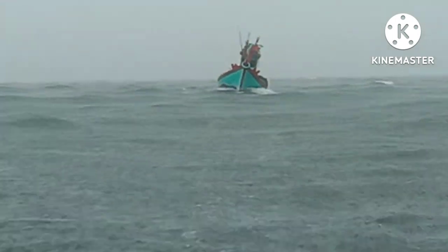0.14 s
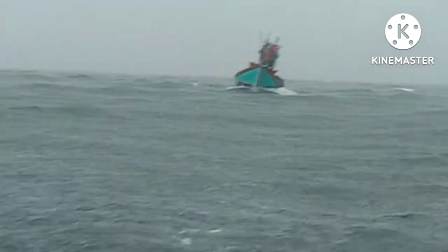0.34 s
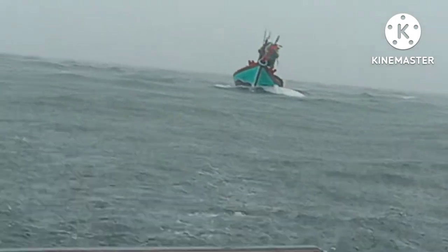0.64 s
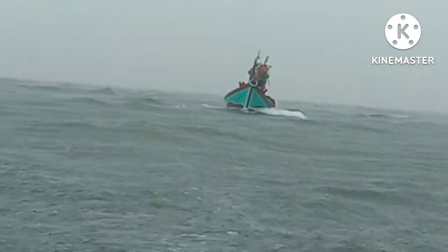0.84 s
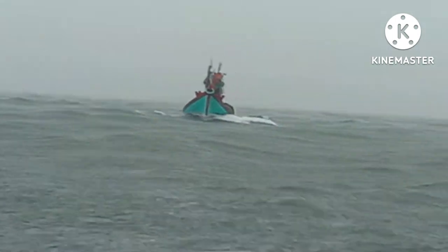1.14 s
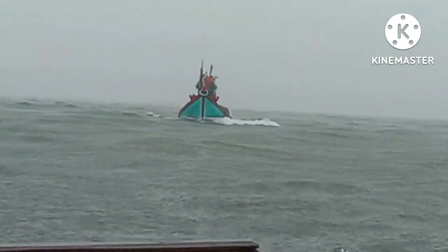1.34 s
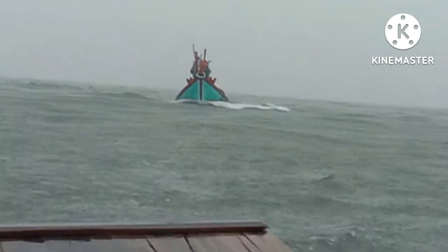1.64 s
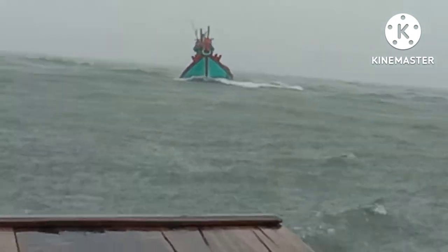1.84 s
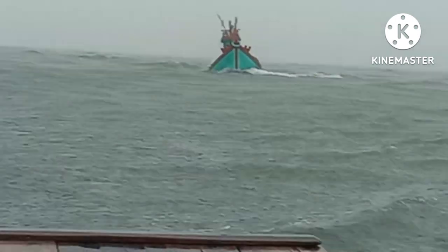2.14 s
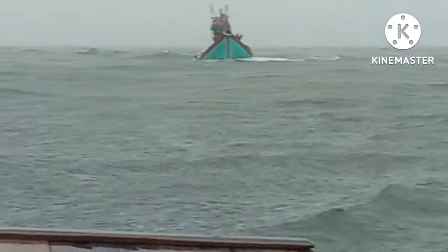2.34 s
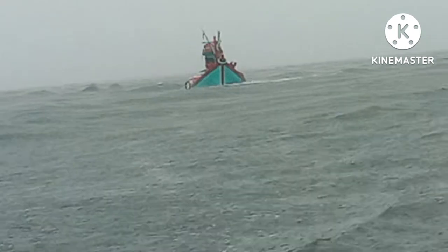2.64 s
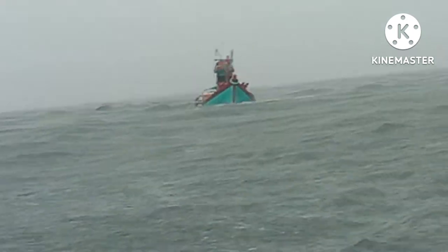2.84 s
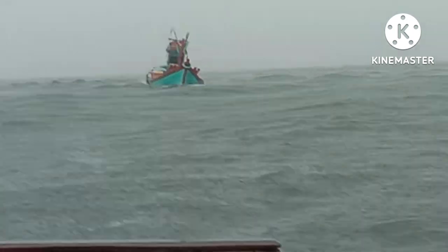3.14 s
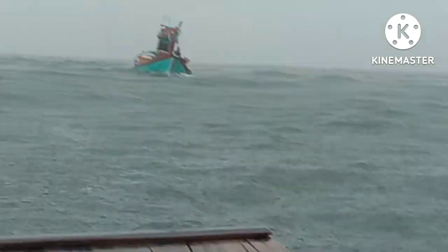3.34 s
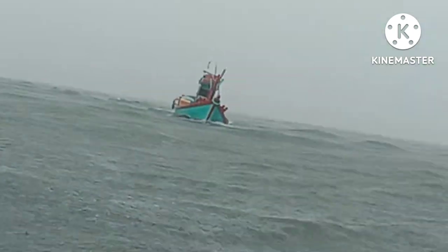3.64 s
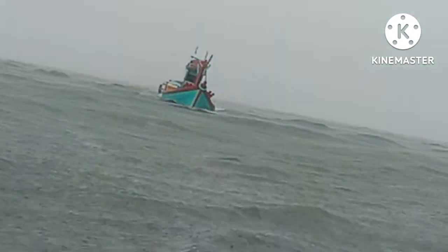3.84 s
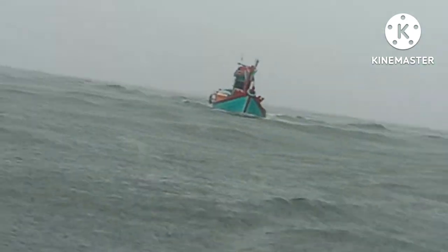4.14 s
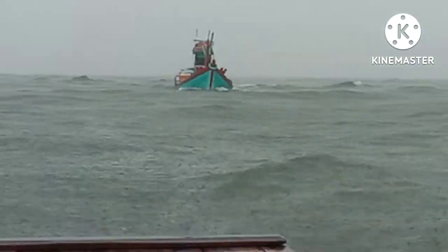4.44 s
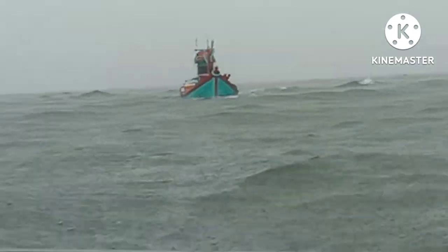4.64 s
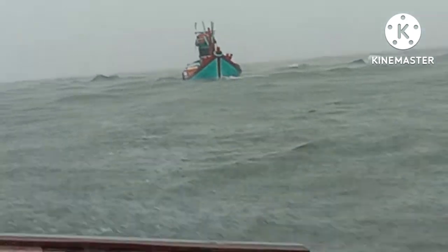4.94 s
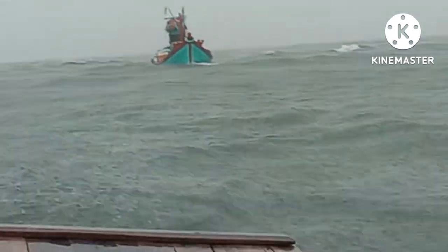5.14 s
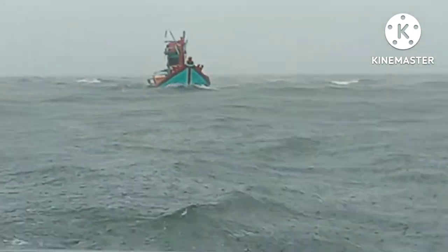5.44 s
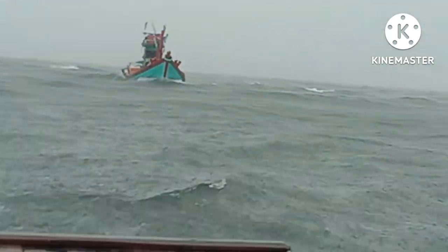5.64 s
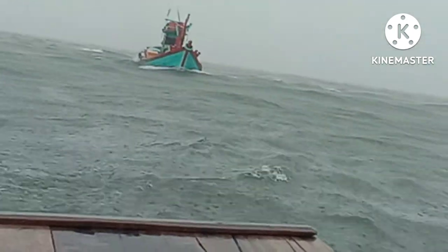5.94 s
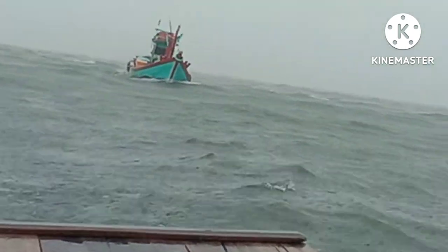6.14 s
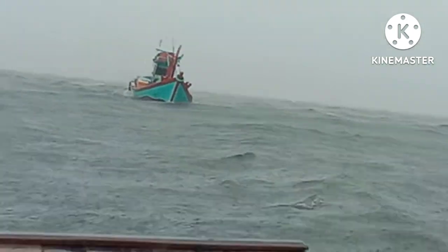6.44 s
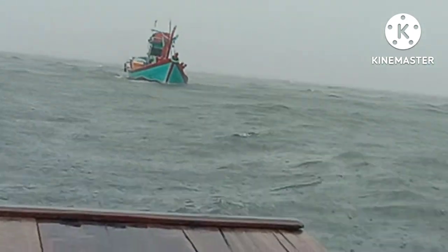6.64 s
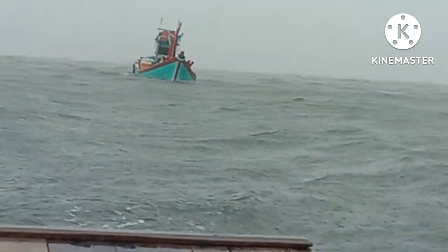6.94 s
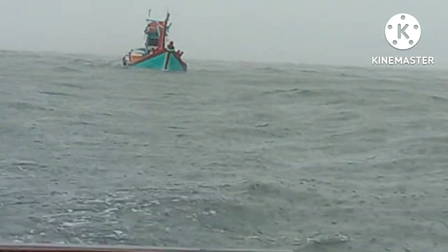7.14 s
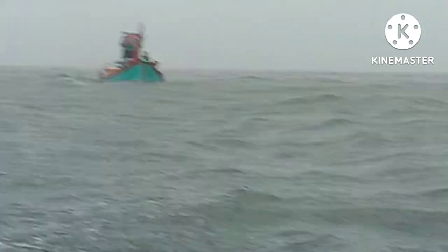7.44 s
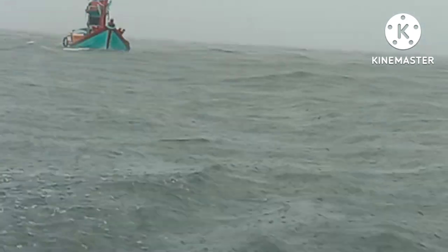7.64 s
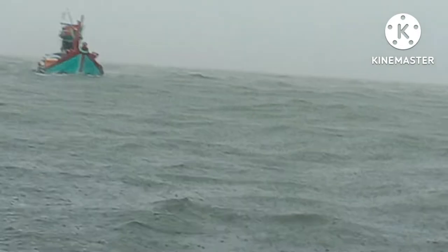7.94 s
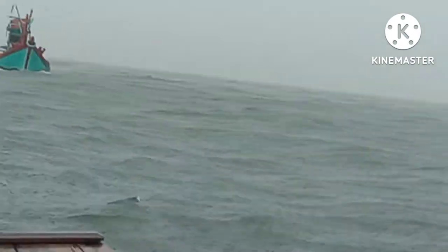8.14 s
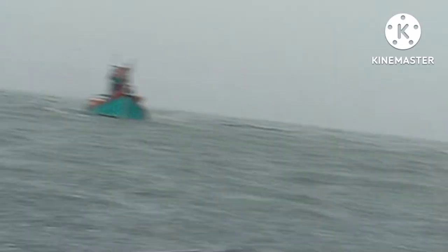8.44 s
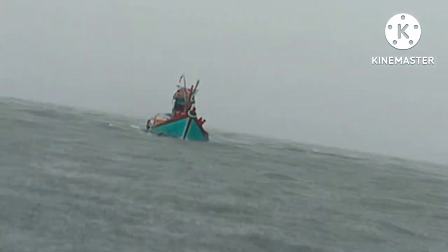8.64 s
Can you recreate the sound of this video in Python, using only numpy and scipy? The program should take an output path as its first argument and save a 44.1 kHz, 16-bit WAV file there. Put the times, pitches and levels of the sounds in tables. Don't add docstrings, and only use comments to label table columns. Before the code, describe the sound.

A single-cylinder diesel on a small wooden boat runs without pause, nearly eight thudding beats a second. Each beat joins a hollow exhaust boom, a deep hull thump, a hard iron knock and a short loose rattle, with small ticks and hiss between. Casing buzz and broad sea and wind wash fill the background. Heard by a phone on deck a few steps away, with little deep bass and dull treble.

```python
import sys
import numpy as np
from scipy import signal
from scipy.fft import rfft, irfft, next_fast_len
from scipy.io import wavfile

SR = 44100
rng = np.random.default_rng(int(sys.argv[2]) if len(sys.argv) > 2 else 0)


def boost(x):
    u = np.asarray(x, float) / 20
    return 10 ** u


def unload_wav(signal):
    wavfile.write(
        sys.argv[1],
        SR,
        np.round(np.clip(np.atleast_2d(signal).T, -1, 1) * 32767).astype(np.int16),
    )


N = 387638
RUN_IN = 13230
FIRST_START_S, CYCLES, CYCLE_MS = -0.0797, 69, 131


def noise():
    return rng.standard_normal(N + RUN_IN)


def rms_one(x):
    return x / np.sqrt(np.mean(x ** 2))


def colour(x, spectrum):
    hz, level_db = np.transpose(spectrum)
    size = next_fast_len(len(x))
    axis_hz = np.maximum(np.arange(size // 2 + 1) * SR / size, 1)
    gain = boost(np.interp(np.log(axis_hz), np.log(hz), level_db))
    return irfft(rfft(x, size) * gain, size)[:len(x)]


def grains(per_s):
    draw = rng.random(N + RUN_IN) * SR / per_s
    struck = draw < 1
    lot = 2 * draw[struck] - 1
    out = np.zeros(N + RUN_IN)
    out[struck] = np.sign(lot) * np.log(np.abs(lot) + 1e-9)
    return rms_one(out) + 1e-18


# (time [s], speed [cycles/s])
SPEED_ON_SWELL = [
    (0.17, 7.664),
    (1.23, 7.61),
    (2.94, 7.691),
    (3.41, 7.599),
    (4.1, 7.577),
    (5.01, 7.718),
    (5.94, 7.632),
    (7.55, 7.696),
    (8.36, 7.619),
]


def starts():
    step_s = .0005
    t = np.arange(FIRST_START_S, 9, step_s)
    done = np.cumsum(np.interp(t, *np.transpose(SPEED_ON_SWELL))) * step_s
    return np.interp(np.arange(CYCLES), done - done[0], t)


def crank():
    start = starts()
    t = (np.arange(N + RUN_IN) - RUN_IN) / SR
    cycle = np.clip(np.searchsorted(start, t) - 1, 0, None)
    return cycle, (t - start[cycle]) * 1000


# (time [s], level [dB])
GAS_LOAD = [
    (0, 0.5),
    (1.5, 0.5),
    (2.4, .5),
    (3.2, 1),
    (4, 0),
    (4.8, 1.5),
    (6, 1),
    (7.2, -0.5),
    (7.8, 2),
    (8.7, 1.5),
]
# (time [s], low knock [dB], high knock [dB], rattle [dB])
UNUSUAL_FIRINGS = [(0.49, -1.5, 0, 1.5), (0.62, -9.5, -4, 0), (0.75, 4, -5, -1), (0.88, -1, -3.5, -9),
                   (1.8, 0, -3, 0), (2.06, -5, 1.5, -3.0), (2.19, 2.5, 1, -4.5), (2.45, 1, 3, -1.5),
                   (2.71, -4.5, -3.5, -0.5), (3.1, 0, -1.0, 5.5), (3.23, -3, -1.5, 3),
                   (4.02, -3.5, 3.5, 0.5), (4.16, -3.0, 5, -2), (4.42, 1, 5, 1), (4.68, -3, 4, 3),
                   (4.81, 2.0, 1, 3), (5.2, 3, -2.5, -2), (5.59, -3, -0.5, 1.5), (5.98, -6.5, -3, 1.5),
                   (6.51, -9.5, -2, 2), (6.9, -3, -3.5, -1), (7.16, -4.5, 1.5, 0.5), (7.42, 2.5, 2.5, -0.5),
                   (7.55, -3.5, 1.5, 3.5), (7.68, 3, 0.5, 2), (8.2, 0.5, -1.5, 1)]
# (low knock [dB], high knock [dB], rattle [dB])
USUAL_DB, SCATTER_DB = (-0.65, 2.5, 2.5), (1.85, 0.5, -1.7)
PIPE_FOLLOWS, HULL_FOLLOWS = .6, .9
PIPE_SCATTER_DB, HULL_SCATTER_DB = 0.4, -0.9


def force():
    chance = rng.standard_normal((CYCLES, 5))
    metal_db = USUAL_DB + np.multiply(SCATTER_DB, chance[:, :3])
    odd = np.array(UNUSUAL_FIRINGS)
    which = np.searchsorted(starts(), odd[:, 0]) - 1
    metal_db[which] = USUAL_DB + odd[:, 1:]
    load_db = np.interp(starts(), *np.transpose(GAS_LOAD))
    pipe_db = PIPE_FOLLOWS * load_db + PIPE_SCATTER_DB * chance[:, 3]
    hull_db = HULL_FOLLOWS * load_db + HULL_SCATTER_DB * chance[:, 4]
    return *metal_db.T, pipe_db, hull_db


def pulses(modes, cycle_db, spread_db):
    out, start = 0, starts()
    for ms, hz, level_db, rise_ms, t60 in modes:
        push = np.full(N + RUN_IN + SR, 1e-18)
        at = np.round((start + ms / 1000) * SR).astype(int) + RUN_IN
        push[at] = boost(level_db + cycle_db + spread_db * rng.standard_normal(len(at)))
        turn = np.exp(2j * np.pi * hz / SR)
        fast, slow = np.exp(-1000 / (rise_ms * SR)), boost(-60 / (t60 * SR))
        dying = signal.lfilter([1], [1, -slow * turn], push)
        rising = signal.lfilter([1], [1, -fast * turn], push)
        out = out + (dying - rising).imag[:N + RUN_IN]
    return out


def gate(timing, jitter_ms):
    start_ms, rise_ms, hold_ms, t60 = timing
    cycle, ms = crank()
    since = ms - start_ms - jitter_ms * rng.standard_normal(CYCLES)[cycle]
    since = np.where(since < 0, since + CYCLE_MS, since)
    fall_db = -60 * np.maximum(since - rise_ms - hold_ms, 0) / (1000 * t60)
    return np.clip(since / rise_ms, 0, 1) * boost(fall_db)


def ring(drive, modes, spread_db, per_s):
    out, cycle = 0, crank()[0]
    for hz, width_hz, level_db in modes:
        r = np.exp(-np.pi * width_hz / SR)
        luck = boost(spread_db * rng.standard_normal(CYCLES))[cycle]
        gain = boost(level_db) * np.sqrt((1 - r * r) / 2)
        push = drive * luck * grains(per_s * width_hz / 60)
        out = out + signal.lfilter([gain, 0, -gain], [1, -2 * r * np.cos(2 * np.pi * hz / SR), r * r], push)
    return out


def engine():
    low_db, high_db, rattle_db, pipe_db, hull_db = force()
    gas = exhaust(pipe_db) + hull(hull_db)
    metal = piston(low_db) + knock(low_db, high_db) + rattle(rattle_db)
    return gas + metal + pump() + valves() + casing()


# (time into cycle [ms], frequency [Hz], level [dB], rise [ms], t60 [s])
PIPE_BOOMS = [
    (-7.78, 261.5, -11.7, 12.85, .43),
    (.04, 233.5, -22.8, 8.7, .36),
    (.76, 258.7, -9.5, 3.74, .47),
    (44.14, 196.7, -27.4, 12, .5),
    (53.18, 257.8, -16.2, 2.8, .24),
    (91.08, 237.6, -14.9, 2.5, .06),
]


def exhaust(pipe_db):
    return pulses(PIPE_BOOMS, pipe_db, spread_db=.4)


# (time into cycle [ms], frequency [Hz], level [dB], rise [ms], t60 [s])
HULL_THUMPS = [
    (38.44, 79, -.9, 12.5, .14),
    (40.18, 144.5, 3, 7.7, .06),
    (42.7, 52.8, -14, 1.5, .06),
    (88.79, 139.2, -8.8, 3.3, .06),
    (104.18, 120.1, -21.2, 1.5, .19),
    (112.57, 158.4, -15, 11.2, .12),
]


def hull(hull_db):
    return pulses(HULL_THUMPS, hull_db, spread_db=.6)


# (time into cycle [ms], frequency [Hz], level [dB], rise [ms], t60 [s])
PISTON_SLAP = [
    (44.47, 490, -16.5, 1.8, 0.067),
    (44.5, 1300, -24.5, 1.2, 0.11),
    (45.5, 1100, -24.5, 1.5, 0.085),
]


def piston(low_db):
    return pulses(PISTON_SLAP, 0.46 * low_db, spread_db=3.5)


# (start [ms], rise [ms], hold [ms], t60 [s])
BLOCK_TIME = (42.6, 5.3, 2, 0.058)
HEAD_TIME = (43.0, 1.8, 8.0, 0.05)
# (frequency [Hz], width [Hz], level [dB])
BLOCK_MODES = [(489.6, 42, -16.5), (959, 39.6, -16), (1227, 63, -15)]
HEAD_MODES = [(1772, 79, -26), (2063, 30, -27.5), (2440, 48, -28), (2900, 110, -32.5), (3162, 53, -33.5),
              (3657, 82, -40), (6480, 120, -37)]
BRIGHT_TIPS = [(8700, 370, -44.5), (9540, 320, -45), (11160, 360, -44), (15000, 600, -39.5)]
# (frequency [Hz], level per Hz [dB])
CRACK_COLOUR = [(250, -5.5), (400, 10), (700, 0), (1500, 0.5), (2600, -4.5), (3500, -0.5), (4300, -36),
                (6000, -12), (7500, -18), (16000, -18.5)]


def knock(low_db, high_db):
    cycle = crank()[0]
    blow, ping = gate(BLOCK_TIME, jitter_ms=0.42), gate(HEAD_TIME, jitter_ms=0.51)
    block = ring(blow * boost(low_db - 1.5)[cycle], BLOCK_MODES, spread_db=0.75, per_s=4000)
    head = ring(ping * boost(high_db - 1.26)[cycle], HEAD_MODES, spread_db=2.8, per_s=3000)
    crack_db = 0.66 * high_db - 21.5 - 1.5
    crack = ping * boost(crack_db)[cycle] * rms_one(colour(grains(4500), CRACK_COLOUR))
    tips = ring(ping * boost(high_db)[cycle], BRIGHT_TIPS, spread_db=3.5, per_s=300)
    return block + head + crack + tips


# (start [ms], rise [ms], hold [ms], t60 [s])
SHAKE_TIME = (60.65, 6.5, 9.4, 0.017)
# (frequency [Hz], width [Hz], level [dB])
LOOSE_GEAR = [(526, 52, -24.5), (973, 47, -27), (1182, 40, -23), (1800, 76, -29.5), (2200, 50, -36.5),
              (2510, 53, -41.5)]


def rattle(rattle_db):
    shake = gate(SHAKE_TIME, jitter_ms=2.4) * boost(rattle_db)[crank()[0]]
    gear = ring(shake * boost(-1.0), LOOSE_GEAR, spread_db=0.0, per_s=1000)
    dull = signal.lfilter(*signal.butter(4, 2500, fs=SR), colour(grains(4000), CRACK_COLOUR))
    return gear + shake * boost(-31.5) * rms_one(dull)


# (time into cycle [ms], frequency [Hz], level [dB], rise [ms], t60 [s])
PLUNGER_TICKS = [
    (19.04, 356, -23, 13, 0.34),
    (18.98, 500, -18, 6, .06),
    (15.03, 688, -28.5, 5, 0.31),
    (14.95, 862, -26.5, 1.7, .15),
    (33, 420, -25, 3.2, 0.088),
]
# (start [ms], rise [ms], hold [ms], t60 [s])
PUMP_STROKE = (15.0, 4, 13, .05)
# (frequency [Hz], width [Hz], level [dB])
PUMP_BODY = [(490, 31, -31.5), (703, 27, -33.5), (857, 58, -31), (1298, 30, -31), (2920, 140, -46),
             (7120, 39, -43)]
FUEL_SPRAY = [(2600, 500, -38), (4300, 900, -45), (9500, 2500, -45)]


def pump():
    ticks = pulses(PLUNGER_TICKS, 0, spread_db=3.0)
    body = ring(gate(PUMP_STROKE, jitter_ms=0.73) * boost(-2.5), PUMP_BODY, spread_db=3.5, per_s=640)
    spray = ring(gate(PUMP_STROKE, jitter_ms=.9), FUEL_SPRAY, spread_db=1.5, per_s=600)
    return ticks + body + spray


# (start [ms], rise [ms], hold [ms], t60 [s])
HISS_TIME = (87.8, 20, 4.4, 0.18)
SEATING_TIME = (98, 5, 2, .09)
# (frequency [Hz], width [Hz], level [dB])
VALVE_HISS = [(1297, 49, -30), (1630, 110, -42.5), (2013, 53, -38.5), (2770, 77, -48), (5340, 940, -42.5)]
VALVE_SEATS = [(480, 50, -31), (1560, 60, -36), (2048, 45, -30)]


def valves():
    hiss = ring(gate(HISS_TIME, jitter_ms=2.5) * boost(3), VALVE_HISS, spread_db=2.2, per_s=500)
    seats = ring(gate(SEATING_TIME, jitter_ms=1.3), VALVE_SEATS, spread_db=1.5, per_s=900)
    return hiss + seats


def lull():
    centre_ms, width_ms, depth_db = 7, 9, -4.5
    ms = crank()[1]
    dip = sum(np.exp(-((ms - centre_ms - turn) / width_ms) ** 2) for turn in (0, CYCLE_MS))
    return boost(depth_db * dip)


# (frequency [Hz], width [Hz], level [dB])
CASING_PLATES = [(402, 79, -40.5), (724, 39, -36.5), (1298, 55, -32), (1566, 30, -40), (2210, 45, -37),
                 (2540, 24, -41), (2956, 45, -46.5), (3545, 120, -46), (3900, 30, -56.5), (5480, 120, -54),
                 (5560, 330, -58), (6430, 90, -67.5)]


def casing():
    return ring(0.69 * lull(), CASING_PLATES, spread_db=3.0, per_s=250)


def drift(rate):
    r = np.exp(-2 * np.pi * rate / SR)
    return rms_one(signal.lfilter([1], [1, -2 * r, r * r], noise()))


# (frequency [Hz], level per Hz [dB])
WASH_COLOUR = [(30, -26), (60, -10.5), (120, -7), (250, -3), (370, -9.5), (700, -13), (1300, -13.5),
               (2200, -17.5), (3300, -26), (4500, -35), (5800, -41.5), (7000, -44.5), (13000, -38),
               (16000, -33)]
# (time [s], level [dB])
WASH_LOUDNESS = [
    (0.0, -23.5),
    (8.79, -24),
]


def wash():
    s, level_db = np.transpose(WASH_LOUDNESS)
    slow_db = np.interp((np.arange(N + RUN_IN) - RUN_IN) / SR, s, level_db)
    flicker_db = 1.7 * drift(14) + .8 * drift(6)
    return boost(slow_db + flicker_db) * rms_one(colour(noise(), WASH_COLOUR))


def scene():
    return (engine() + lull() * wash())[None, RUN_IN:]


# (frequency [Hz], level [dB])
PHONE_TOP = [(6050, -1), (6300, -13), (7100, -9.5), (7500, -22), (8300, -30), (9500, -19.5), (11500, -29.5),
             (13800, -35.5), (15000, -25.5), (15700, -30)]


def phone(x):
    x = signal.sosfilt(signal.butter(6, 50, "high", fs=SR, output="sos"), x)
    return colour(1.2 * np.tanh(x / 1.2), PHONE_TOP)


def band_limit(x):
    return signal.sosfilt(signal.butter(12, 15780, fs=SR, output="sos"), x)


def record(dry):
    mix = phone(dry[0])[None]
    return band_limit(mix)


dry = scene()
out = record(dry)
unload_wav(out)
```